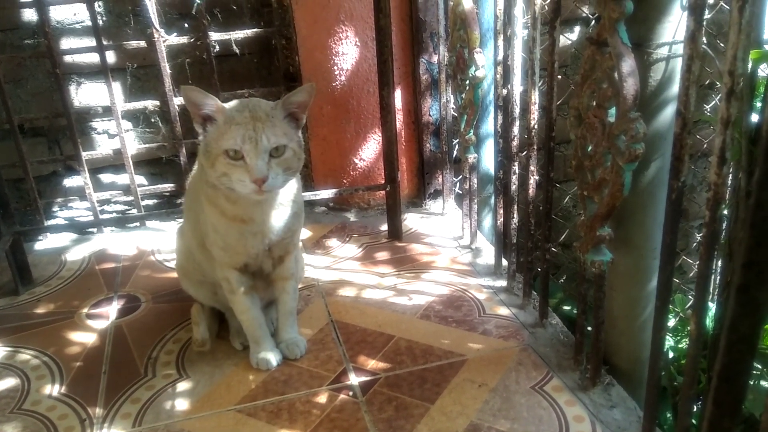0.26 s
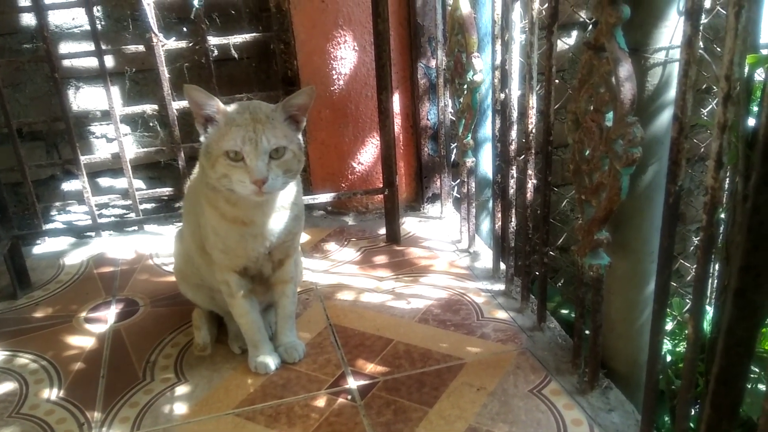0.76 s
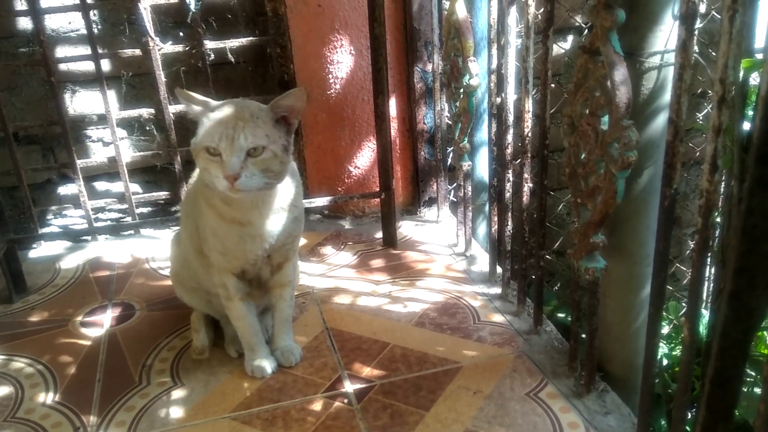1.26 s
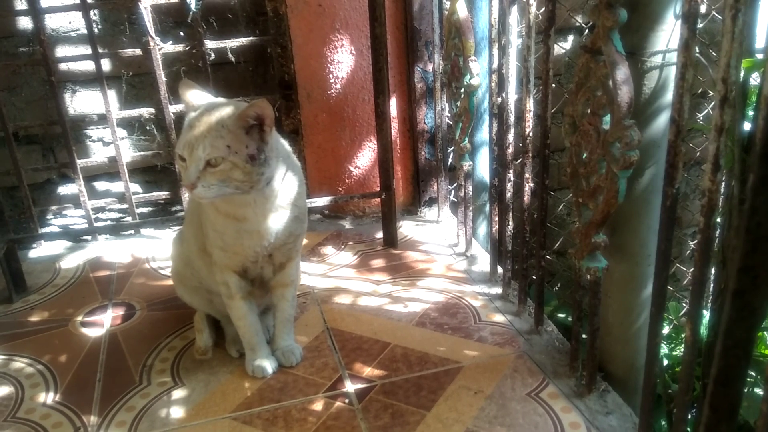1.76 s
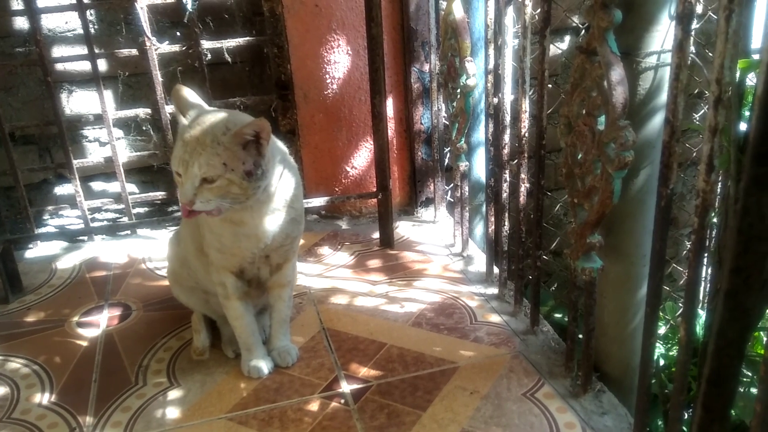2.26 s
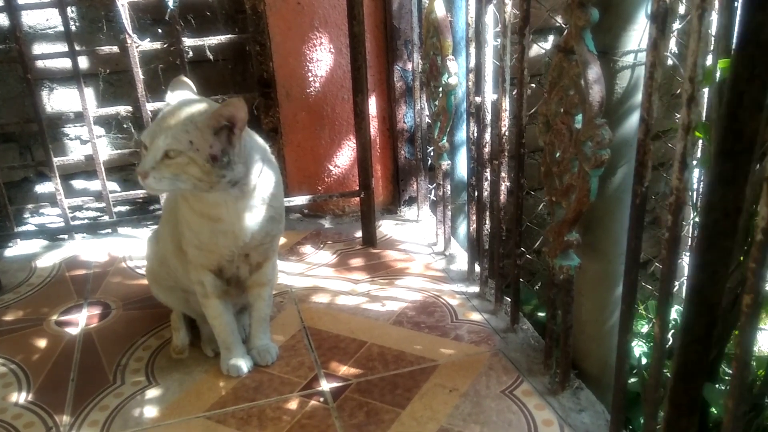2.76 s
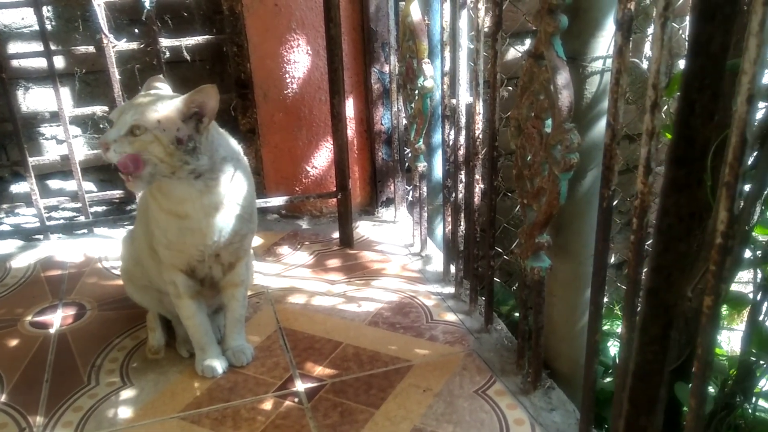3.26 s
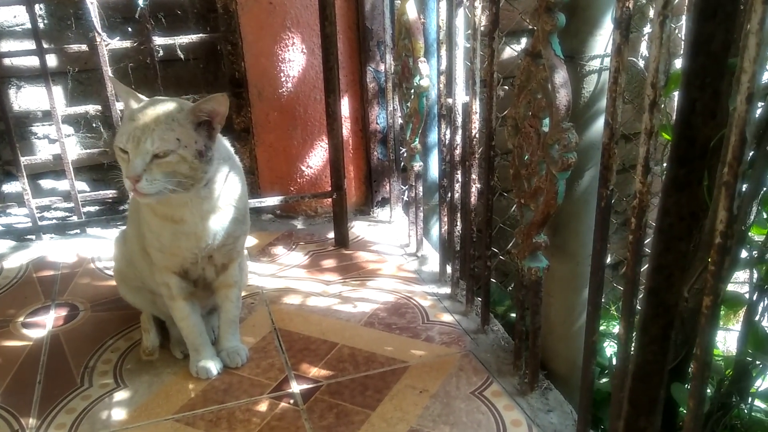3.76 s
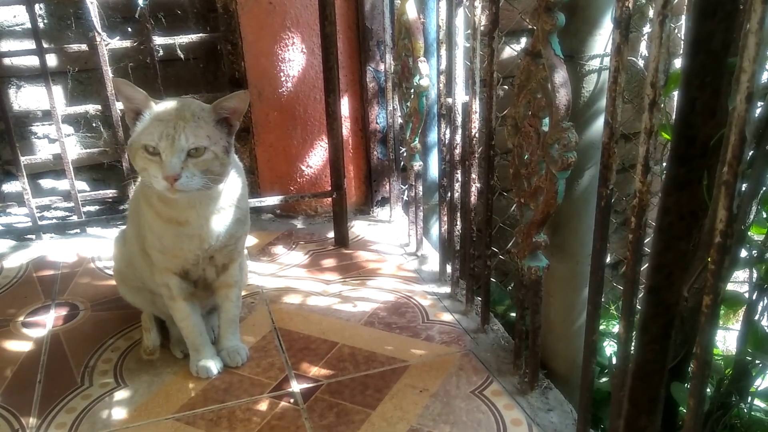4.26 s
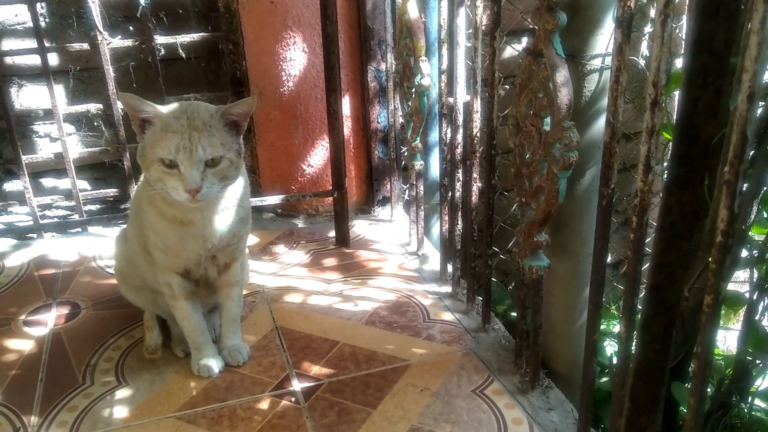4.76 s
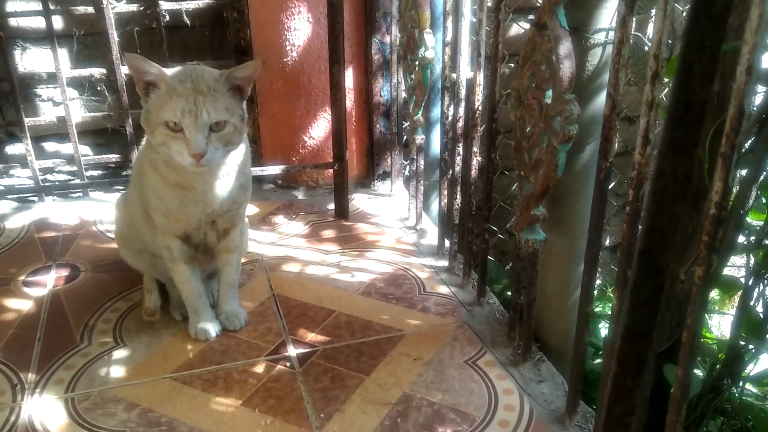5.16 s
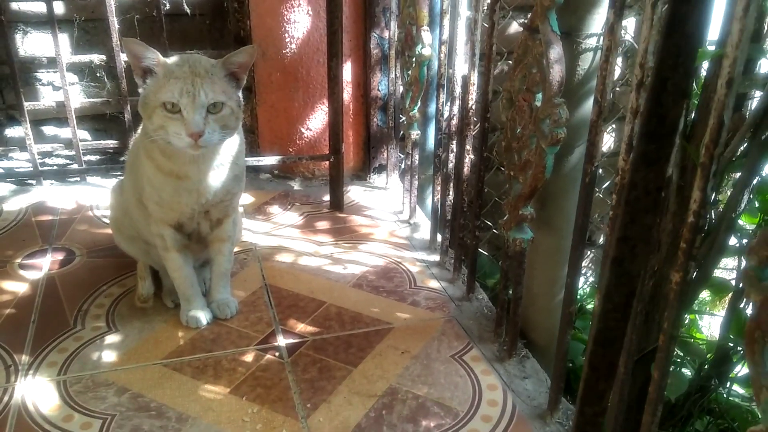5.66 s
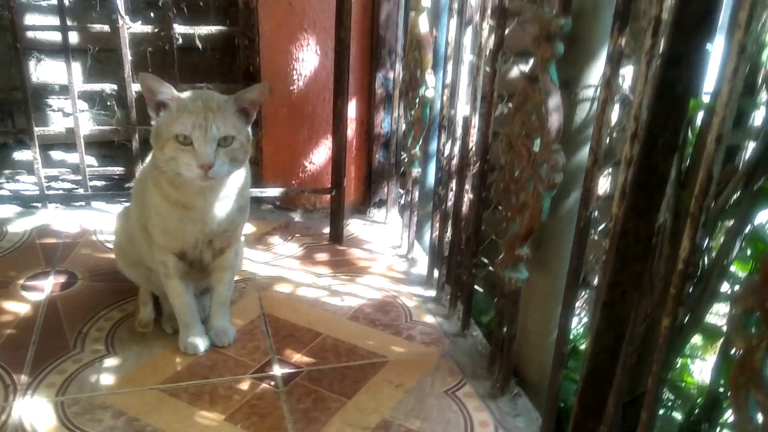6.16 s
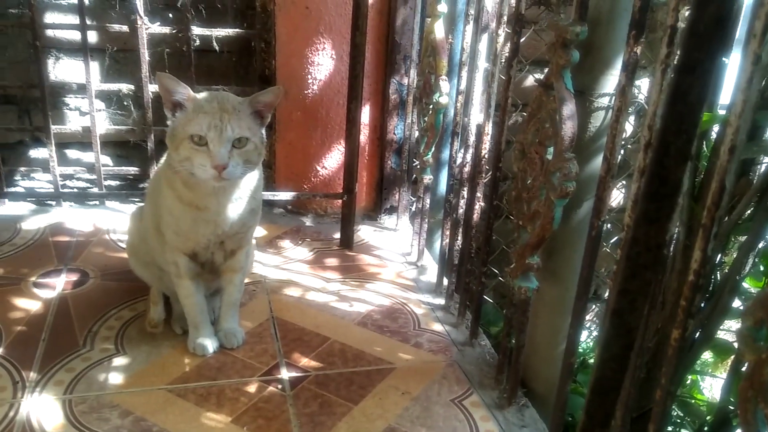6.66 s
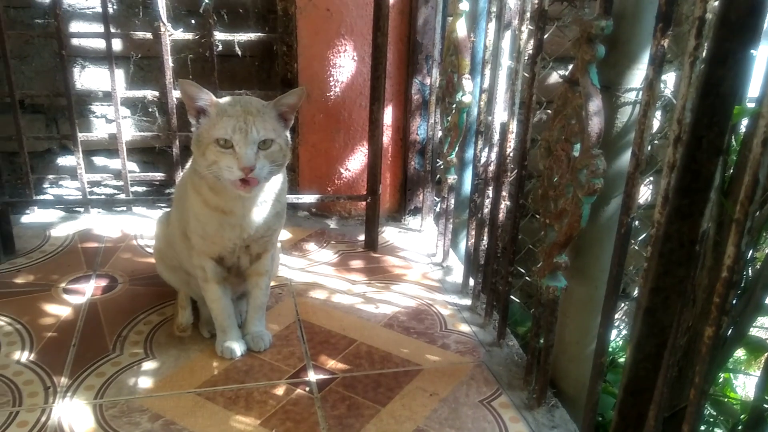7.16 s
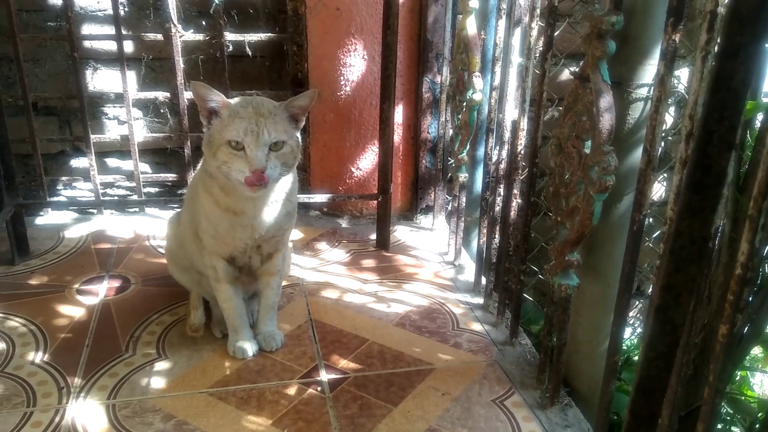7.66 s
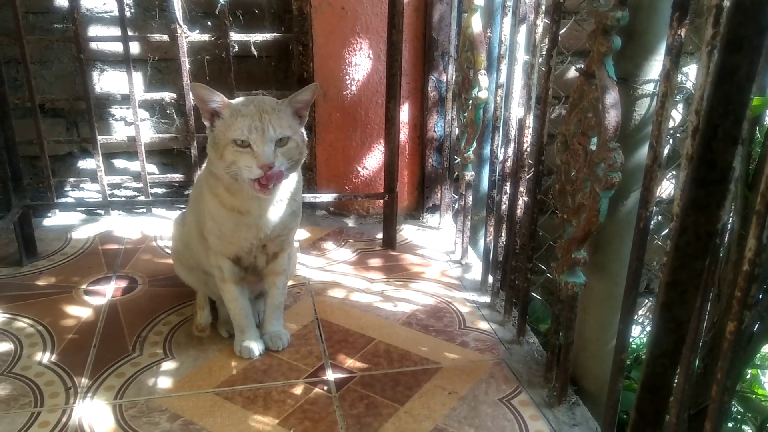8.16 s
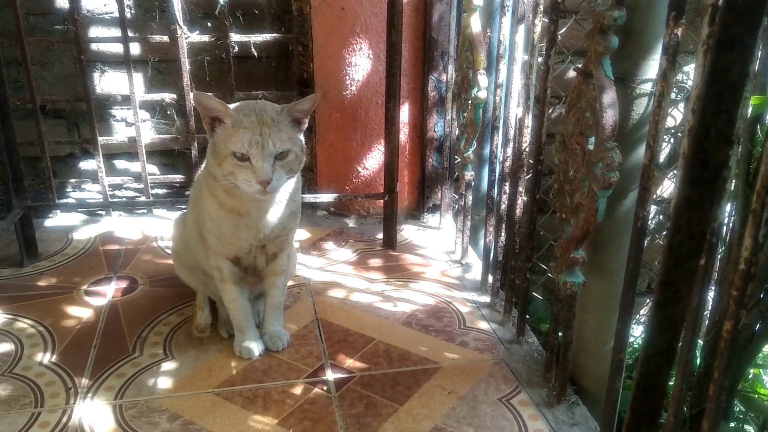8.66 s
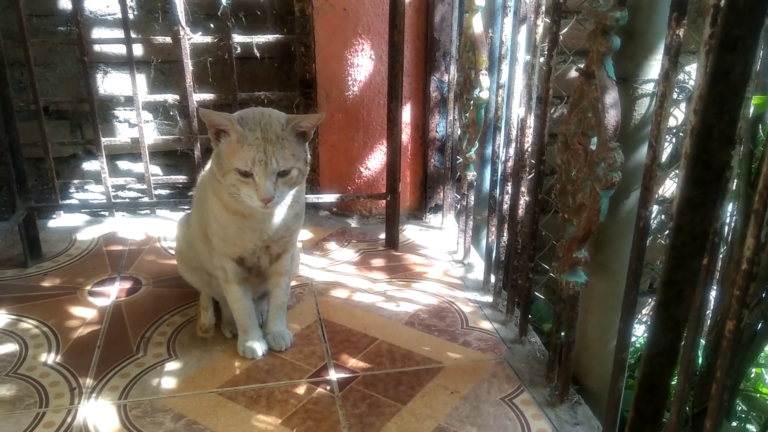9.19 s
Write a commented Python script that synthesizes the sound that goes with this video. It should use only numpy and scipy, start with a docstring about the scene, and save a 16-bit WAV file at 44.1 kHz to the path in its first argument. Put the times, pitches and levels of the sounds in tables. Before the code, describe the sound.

Close stereo pickup of a cat: three nasal, slightly raspy meows, the second strongest, with a scratchy high squeak before the softer third. Thin rising bird chirps dot the background with slight hard-walled reflections. Then a small motorbike approaches beyond the railings, its puttering engine climbing, snapping off throttle as it passes, pulling again and dying into the distance. Noise suppression thins the background between sounds.

```python
"""A cat close by meows three times on a tiled verandah; between the calls come one harsh squeak,
from uneven pulses in a throat resonance, and the rising chirps of a small bird, gliding whistles.
Then a single-cylinder motorbike, firing orders and pulsing noise, pulls away, passes outside and fades.
Each meow is harmonics under a moving mouth resonance with a raspy edge.
Two spaced microphone ports hear it; a noise suppressor lowers the outdoor background when all is quiet."""
import sys
import numpy as np
from scipy import signal
from scipy.fft import rfft, irfft, next_fast_len
from scipy.io import wavfile
from scipy.ndimage import uniform_filter1d

SR = 44100
rng = np.random.default_rng(int(sys.argv[2]) if len(sys.argv) > 2 else 0)


def transcribe(u):
    """Save the signal u as a 16-bit wav file named by the first command-line argument.

    u: samples, shape (n,) or (channels, n), limited to [-1, 1]; the rate is SR.
    q: integer samples, one column per channel.
    """
    v = np.clip(np.atleast_2d(u).T, -1, 1)
    q = np.round(v * 32767).astype(np.int16)
    wavfile.write(sys.argv[1], SR, q)


N = 415863
TIME = np.arange(N) / SR

# outdoor background, spectrum: (frequency [Hz], level [dB])
OUTDOORS = [(25, -20.5), (55, -19.5), (90, 4.5), (140, 5), (400, 3), (1500, -3), (3500, -9.5), (7700, -16),
            (8500, -40), (15000, -33.5)]

# microphone ports, phase by which the left leads: (frequency [Hz], lead [rad])
PORT_PHASE = [(100, .5), (700, .44), (1150, -1.4), (1550, -1.5), (1850, -2.7), (2400, -2), (2900, -1.5),
              (3600, -3)]
# likeness of diffuse sound at the two ports: (frequency [Hz], likeness [0-1])
LIKENESS = [(150, 0.28), (700, 0.99), (1400, 0.38), (2500, .58), (3550, 1), (4200, .07)]
# response of the right port: (frequency [Hz], gain [dB])
RIGHT_PORT = [(100, 1.46), (2800, 0), (4500, 2), (6200, 0.5), (7700, -5.5), (8300, -17.5), (10500, -10.5)]
CUTOFF_HZ = 15650

# bird chirps: (start [s], level [dB])
CHIRPS = [(.115, -51), (.9, -53), (1.86, -49), (2.62, -52), (3.53, -39), (4.045, -70), (4.575, -48),
          (5.68, -60), (6.025, -53), (6.73, -47)]
# a soft rustle as the cat licks its lips and shifts:
# (start [s], attack [s], hold [s], release [s], level [dB])
RUSTLE = (2.32, .15, .02, .25, -57)
# the squeak: (start [s], attack [s], hold [s], release [s], level [dB], sag [dB/s])
SQUEAK = (2.93, .065, .145, .045, -20.3, 28)
# throat during the squeak: (frequency [Hz], gain [dB])
SQUEAK_THROAT = [(150, -66), (330, -37), (410, -25.5), (520, -41.5), (1900, -39.5), (2080, -22),
                 (2250, -28), (2500, -5), (2700, -25), (2950, -9), (3300, 5), (3700, -8), (5300, -27.5),
                 (7100, -20), (8300, -35), (15000, -46)]

# engine speed: (time [s], firing rate [1/s])
ENGINE = [(4.54, 27), (5.1, 27.3), (5.8, 32.3), (6.35, 37), (6.75, 39.3), (6.9, 38.5), (7.0, 35.6),
          (7.38, 28.2), (8.0, 29.3), (8.5, 28.3), (8.9, 23.5)]
# spectrum of the engine and road noise: (frequency [Hz], level [dB])
ROAR_COLOUR = [(60, 17), (130, -4), (240, -1.5), (330, -6), (950, 1), (1350, 4), (2000, -7.5), (3100, -17),
               (3580, -27), (4050, -14), (7600, -17), (8300, -29), (9400, -28.5), (15500, -45)]
# resonance of the silencer: (frequency [Hz], gain [dB])
PIPE = [(70, -21), (115, -6.5), (138, 6), (158, 3.5), (185, -24), (235, -5), (300, -35)]
# the engine's whine, which sinks as the bike goes by: (time [s], frequency [Hz], level [dB])
WHINE = [(5.2, 1280, -66), (6.8, 1540, -41.5), (7.1, 1400, -46), (7.25, 1260, -54), (7.59, 1200, -53),
         (7.65, 1170, -41), (8.7, 1100, -62)]
# the engine's hollow growl, sinking likewise: (time [s], frequency [Hz], level [dB])
GROWL = [(4.7, 800, -70), (6.92, 730, -48), (7.1, 680, -36), (7.19, 620, -50), (7.58, 510, -47),
         (7.635, 450, -38), (7.72, 420, -47), (9.2, 450, -68)]
# what the rider does, in order: pulling hard, top revs, throttle snapping shut with a blare,
# coasting, next gear, easing off far away:
# (start [s], length [s], change of rumble [dB], of clatter [dB], of hiss [dB], of pipe note [dB])
GEAR_CHANGES = [(5.9, .55, 0, .5, 0, 4.5), (6.55, .37, 1.5, 3.5, 2, -2), (6.95, .21, 4, 1.5, 1, 7.5),
                (7.19, .42, -5, -7, -7, -2), (7.62, .48, 2, 1.5, 1.5, -2), (9.0, .6, -1, -3.5, -1, -9)]
THROTTLE_S = .09
# knocks as the bike crosses bumps: (time [s], level [dB], brightness [0-1])
BUMPS = [(6.383, -44, 1), (6.764, -34, .5), (7.618, -32, .4), (7.755, -39, .9)]
# the bike is nearest at PASS_S; the other two set how fast its distance shrinks before and grows after
PASS_S, APPROACH_S, LEAVE_S = 7.2, 1.0, 1.17

# gesture of each meow; the mouth resonance rises as the jaw opens:
# (time [s], pitch [Hz], effort [dB], mouth resonance [Hz], treble [dB])
FIRST_MEOW = [(0.11, 422.0, -86.0, 1054.0, -75.0), (0.195, 465.0, -43.0, 1179.0, -52.0),
              (0.275, 475.0, -34.0, 1316.0, -48.0), (0.315, 500.0, -40.0, 1291.0, -51.0),
              (0.343, 500.0, -30.0, 1348.0, -46.0), (0.376, 515.0, -34.0, 1504.0, -41.0),
              (0.414, 527.0, -29.0, 1460.0, -41.0), (0.436, 524.0, -28.0, 1481.0, -36.0),
              (0.455, 531.0, -29.0, 1491.0, -41.0), (0.476, 524.0, -28.0, 1505.0, -39.0),
              (0.556, 512.0, -33.0, 1526.0, -47.0), (0.673, 509.0, -42.0, 1510.0, -46.0),
              (0.695, 514.0, -54.0, 1452.0, -57.0), (0.761, 508.0, -73.0, 1373.0, -79.0)]
SECOND_MEOW = [(1.458, 513.0, -78.0, 1124.0, -91.0), (1.553, 517.0, -43.0, 1186.0, -51.0),
               (1.612, 533.0, -34.0, 1436.0, -47.0), (1.667, 550.0, -21.0, 1444.0, -52.0),
               (1.7, 576.0, -27.0, 1645.0, -36.0), (1.767, 593.0, -24.0, 1676.0, -38.0),
               (1.85, 600.0, -18.0, 1671.0, -38.0), (2.014, 602.0, -18.0, 1638.0, -40.0),
               (2.1, 615.0, -16.0, 1513.0, -40.0), (2.166, 607.0, -20.0, 1357.0, -41.0),
               (2.249, 576.0, -20.0, 1451.0, -36.0), (2.294, 560.0, -44.0, 1253.0, -67.0),
               (2.36, 561.0, -77.0, 1238.0, -76.0)]
THIRD_MEOW = [(3.351, 529.0, -103.0, 1107.0, -79.0), (3.409, 534.0, -69.0, 1054.0, -76.0),
              (3.538, 529.0, -54.0, 1124.0, -49.0), (3.573, 547.0, -32.0, 1235.0, -56.0),
              (3.641, 530.0, -38.0, 1241.0, -46.0), (3.684, 522.0, -33.0, 1319.0, -43.0),
              (3.798, 526.0, -35.0, 1278.0, -51.0), (3.901, 517.0, -40.0, 1149.0, -57.0),
              (3.937, 506.0, -34.0, 1257.0, -60.0), (3.991, 501.0, -39.0, 1155.0, -66.0),
              (4.025, 495.0, -64.0, 1125.0, -74.0), (4.08, 473.0, -76.0, 1106.0, -76.0)]
# the meows: (gesture, left-right lean of harmonics 2 to 5 [dB], lift of harmonics 4 and 5 [dB],
# left port's fade [s], centre of the nasal trough [Hz], nasal ring [dB], rasp [dB])
MEOWS = [(FIRST_MEOW, (0, -6.5, 3, 6.5), (6, 4), .65, 1964, 10, -7), (SECOND_MEOW, (.4, -5.3, -2.3, 3.8),
         (6, 8), 2.25, 1984, 3, -6), (THIRD_MEOW, (-2.7, -12, -.7, 1.8), (4.2, -1.6), 3.86, 1762, 15, -8)]
# throat of the meows: (frequency [Hz], gain [dB])
THROAT = [(900, -7), (1550, -12), (1820, -9), (2400, 5), (2650, 2), (2740, 19), (2830, -19), (3050, -16)]
MOUTH_DB, MOUTH_HALF_WIDTH_HZ = 29.8, 95
TROUGH_DB, TROUGH_HALF_WIDTH_HZ = 17, 125
# bright edge of the voice, above the fifth harmonic: (frequency [Hz], level [dB])
EDGE = [(3150, -4), (3650, -18), (4200, 1), (4800, 3), (6000, 0), (7200, -2), (7750, 0), (8400, -27),
        (9100, -8), (9800, -11), (10600, -31), (15000, -33)]
# share of the nasal ring that lifts the bright edge: (frequency [Hz], share [0-1])
NASAL = [(3700, 0), (4250, .2), (4720, 1), (5600, .75), (6300, .3), (6800, .1)]
# late in each call a wall reflection briefly cancels it at the left port
NULL_DB, NULL_S = 14, .05


def from_db(db):
    """Decibels to gain."""
    return 10 ** (np.asarray(db) / 20)


def rms_one(x):
    """Scale to unit power."""
    return x / np.sqrt(np.mean(x ** 2) + 1e-20)


def in_time(rows, t=TIME):
    """The columns of a curve table at the times t."""
    s, *columns = np.transpose(rows)
    return [np.interp(t, s, c) for c in columns]


def at_hz(points, hz):
    """Read a spectrum on a log-frequency axis."""
    f, value = np.transpose(points)
    return np.interp(np.log(hz), np.log(f), value)


def span(rows):
    """The samples that a curve table covers."""
    return slice(int(rows[0][0] * SR), int(rows[-1][0] * SR))


def swell(start, attack, hold, release, drop_db):
    """The samples that a short sound covers, and its rounded rise, hold and fall in dB."""
    part = slice(int(start * SR), int((start + attack + hold + release) * SR))
    corners = np.cumsum([0, attack, hold, release])
    away = np.interp(TIME[part] - start, corners, [1, 0, 0, 1])
    return part, -drop_db * away ** 2


def filtered(x, response):
    """Apply a frequency response, given as a function of Hz."""
    n = x.shape[-1]
    size = next_fast_len(n + 2048, True)
    hz = np.maximum(np.arange(size // 2 + 1) * SR / size, 1)
    return irfft(rfft(x, size) * response(hz), size)[..., :n]


def drift(rate, n):
    """Smooth chance of spread 1 that changes about rate times a second, drawn at every 16th sample."""
    coarse = rng.standard_normal(n // 16 + 2)
    slow = filtered(coarse, lambda hz: 1 / (1 + (hz / 16 / rate) ** 4))
    return np.interp(np.arange(n) / 16, np.arange(len(slow)), rms_one(slow))


def diffuse(colour, n=N, low_hz=1, high_hz=SR):
    """Coloured noise from all around, as alike at the two ports as LIKENESS says; rms 1."""
    def port_pair(hz):
        alike = np.clip(at_hz(LIKENESS, hz), 0, .99)
        band = ((1 + (low_hz / hz) ** 8) * (1 + (hz / high_hz) ** 8)) ** -.5
        return np.sqrt([1 + alike, 1 - alike]) * band * from_db(at_hz(colour, hz))
    mid, side = filtered(rng.standard_normal((2, n)), port_pair)
    return rms_one(np.array([mid + side, mid - side]))


def background(sound, open_db=-51, open_at_db=-30, slope=0.63, depth_db=21):
    """The suppressor lets the outdoor rush through as far as the sound is loud."""
    power = uniform_filter1d(np.mean(sound ** 2, axis=0), int(0.018 * SR))
    level = 10 * np.log10(np.maximum(power, 1e-12))
    closing_db = np.clip(slope * (level - open_at_db), -depth_db, 0)
    return from_db(open_db + closing_db) * diffuse(OUTDOORS)


def verandah(x, t60):
    """A thin, dying scatter from tiles, wall and railings."""
    age = TIME[:int(t60 * SR)]
    scatter = diffuse([(100, 5.5), (5000, -1), (12000, -16.5)], len(age))
    tail = scatter * from_db(-60 * age / t60) * (age > .008)
    return signal.fftconvolve(x, tail / np.sqrt(np.sum(tail ** 2) / 2), axes=1)[:, :N]


def walls(x, echo=0.15, count=9):
    """Near walls and the floor return a few fast echoes, which comb the spectrum into fixed streaks."""
    out = x.copy()
    for lag in (rng.uniform(.004, .03, count) * SR).astype(int):
        out[:, lag:] += echo * rng.choice([-1, 1]) * x[:, :-lag]
    return out / np.sqrt(1 + count * echo ** 2)


def bird(buzz_hz=135, buzz=.012, waver=.035, headroom_hz=140, length=.135, first_hz=4400, last_hz=5350):
    """Whistles glide up, rough then purer, and reach the two ports by different paths."""
    out = np.zeros((2, N))
    for start, db in CHIRPS:
        at, n = int(start * SR), int(length * SR)
        progress = np.linspace(0, 1, n)
        rise = np.sin(np.pi / 2 * np.clip((progress - .12) / .5, 0, 1)) ** 2
        glide = first_hz + (last_hz - first_hz) * rise
        rough = np.linspace(2, .3, n)
        trill = np.sin(2 * np.pi * np.cumsum(buzz_hz * (1 + drift(20, n) / 10)) / SR)
        envelope = from_db(db) * np.sin(np.pi * progress ** 1.15) ** 2 * (1 + 0.25 * trill)
        for port in out:
            pitch = glide * (1 + rough * (buzz * trill + waver * drift(500, n)))
            pitch = np.minimum(pitch, glide.max() + headroom_hz)
            port[at:at + n] += envelope * np.sqrt(2) * np.sin(2 * np.pi * np.cumsum(pitch) / SR)
    return out


def rustle():
    """A soft swell of noise from fur and lips."""
    *timing, level_db = RUSTLE
    part, shape_db = swell(*timing, drop_db=36)
    out = np.zeros((2, N))
    noise = diffuse(OUTDOORS, len(shape_db), low_hz=434, high_hz=5500)
    out[:, part] = from_db(level_db + shape_db) * noise
    return out


def squeak(pitch_hz=410, jitter=.06, air_db=-2, flutter_db=1.0):
    """Very uneven pulses and pulsing air drive a narrow high throat resonance."""
    *timing, level_db, sag = SQUEAK
    part, shape_db = swell(*timing, drop_db=52)
    n = len(shape_db)
    since_attack = np.maximum(np.arange(n) / SR - timing[1], 0)
    level = level_db + shape_db - sag * since_attack
    cycles = np.cumsum(pitch_hz * (1 + jitter * drift(250, n))) / SR
    pulses = np.diff(np.floor(cycles), prepend=0)  # one click a cycle
    voiced = rms_one(filtered(pulses, lambda hz: from_db(at_hz(SQUEAK_THROAT, hz))))
    air = diffuse(SQUEAK_THROAT, n) * (1 + 0.29 * np.cos(2 * np.pi * cycles))
    out = np.zeros((2, N))
    out[:, part] = from_db(level + flutter_db * drift(130, n)) * rms_one(voiced + from_db(air_db) * air)
    return out


def passing(nearest_db, falloff_db):
    """Level of a part of the bike in dB: it drops by falloff_db for a tenfold distance."""
    pace_s = np.where(TIME < PASS_S, APPROACH_S, LEAVE_S)
    distance = np.hypot(1, (TIME - PASS_S) / pace_s)  # 1 at the nearest point
    return nearest_db - falloff_db * np.log10(distance)


def throttle():
    """What the gear changes add to rumble, clatter, hiss and pipe note, in dB."""
    total = 0
    for start, length, *change_db in GEAR_CHANGES:
        to_edge = np.minimum(TIME - start, start + length - TIME)
        total = total + np.outer(change_db, np.clip(to_edge / THROTTLE_S + .5, 0, 1))
    return total


def exhaust(phase, firing, throttle_db, fade_db=3.0, wander=0.3, turn_s=6.82, waver_db=2.2,
            behind_tilt_db=8.0):
    """Orders of the firing rate slide through the silencer's resonance, fading unevenly among houses."""
    # as the bike draws level, the open pipe turns to the verandah and its low orders take over
    behind = np.clip((TIME - turn_s) / 0.15, 0, 1)
    orders = range(3, 10)
    gains = []
    for k in orders:
        tilt_db = behind_tilt_db * behind * min(k, 5)
        gains.append(from_db(at_hz(PIPE, k * firing) - tilt_db + fade_db * drift(6.05, N)))
    gains = np.array(gains)
    gains /= np.sqrt(np.sum(gains ** 2, axis=0))
    pipe = sum(gain * np.sin(k * phase + wander * drift(12, N)) for k, gain in zip(orders, gains))
    pipe_level_db = passing(nearest_db=-43, falloff_db=44) + throttle_db
    note = from_db(pipe_level_db + waver_db * drift(5, N)) * pipe
    # the deep boom at twice the firing rate radiates only at high revs
    radiated_db = at_hz([(57, -36), (69, -20), (77, 0)], 2 * firing)
    boom = from_db(passing(nearest_db=-48, falloff_db=40) + radiated_db) * np.sin(2 * phase)
    return np.sqrt(2) * (note + boom)


def resonance(curve, half_width_hz, apart):
    """Engine noise rings in one narrow, moving resonance; apart is how much the two ports differ."""
    hz, db = in_time(curve)
    carrier = np.exp(2j * np.pi * np.cumsum(hz) / SR)
    mid, side = [np.real(carrier * (drift(half_width_hz, N) + 1j * drift(half_width_hz, N)))
                 for _ in range(2)]
    return from_db(db) * rms_one(mid + apart * side * [[1], [-1]])


def motorbike(throb=0.12, flicker_db=1.55):
    """Firing drives exhaust orders and puffs in the noise; treble fades fastest with distance."""
    firing, = in_time(ENGINE)
    phase = 2 * np.pi * np.cumsum(firing * (1 + .008 * drift(8, N))) / SR
    *roar_db, pipe_db = throttle()
    rumble_db, clatter_db, hiss_db = [db + flicker_db * drift(32, N) for db in roar_db]
    rumble = diffuse(ROAR_COLOUR, low_hz=166, high_hz=740)
    roar = from_db(passing(nearest_db=-39.5, falloff_db=64) + rumble_db) * rumble
    clatter = diffuse(ROAR_COLOUR, low_hz=780, high_hz=2300)
    roar += from_db(passing(nearest_db=-39, falloff_db=66) + clatter_db) * clatter
    # the engine's clatter carries forwards, so it is heard from afar on the approach
    ahead = np.clip(PASS_S - TIME, 0, 1)
    forward = diffuse(ROAR_COLOUR, low_hz=800, high_hz=890)
    roar += ahead * from_db(passing(nearest_db=-53, falloff_db=32)) * forward
    rings = resonance(WHINE, half_width_hz=150, apart=.5) + resonance(GROWL, half_width_hz=110, apart=.2)
    hiss = from_db(passing(nearest_db=-37.5, falloff_db=84) + hiss_db) * diffuse(ROAR_COLOUR, low_hz=2000)
    puffs = 1 + throb * np.cos(phase)
    running = np.clip((TIME - ENGINE[0][0]) / 0.16, 0, 1)
    return running * (exhaust(phase, firing, pipe_db) + walls(puffs * roar + hiss) + puffs * rings)


def bumps(t60=0.42, rise_s=0.002):
    """Loose parts of the bike rattle briefly after each jolt: decaying noise, dull to bright."""
    dull = diffuse(ROAR_COLOUR, low_hz=201, high_hz=2050)
    bright = diffuse(ROAR_COLOUR, low_hz=3300)
    out = np.zeros((2, N))
    for s, db, brightness in BUMPS:
        part = slice(int(s * SR), int((s + t60) * SR))
        age = TIME[part] - TIME[part][0]
        envelope = from_db(db - 60 * age / t60) * (1 - np.exp(-age / rise_s))
        out[:, part] += envelope * ((1 - brightness) * dull[:, part] + brightness * bright[:, part])
    return out


def tract(hz, mouth_hz, trough_hz):
    """Gain in dB of the throat, the mouth resonance and the trough that the nose cuts."""
    mouth = MOUTH_DB / (1 + ((hz - mouth_hz) / MOUTH_HALF_WIDTH_HZ) ** 2)
    trough = TROUGH_DB / (1 + np.abs((hz - trough_hz) / TROUGH_HALF_WIDTH_HZ) ** 10)
    return at_hz(THROAT, hz) + mouth - trough


def edge(pitch, phase, nasal_db, rasp_db, flicker=.5, halfway_db=-12):
    """Upper harmonics, weaker lines between and pulsing rasp ring in the nose, mixed per port; rms 1."""
    n = len(pitch)
    colour = [(hz, at_hz(EDGE, hz) + nasal_db * at_hz(NASAL, hz)) for hz in np.geomspace(3000, 15000, 100)]
    upper = np.zeros((2, n))
    for k in range(6, 22):
        for port in upper:
            gain = from_db(at_hz(colour, k * pitch)) * (1 + flicker * drift(22, n))
            port += gain * np.sin(k * phase + 0.8 * drift(9.2, n) + .2 * drift(150, n))
        between = from_db(at_hz(colour, (k + .5) * pitch) + halfway_db) * drift(60, n)
        upper += between * np.sin((k + .5) * phase)
    rasp = diffuse(colour, n, low_hz=3400) * (1 + .7 * np.cos(phase))
    return rms_one(rms_one(upper) + from_db(rasp_db) * rasp)


def meow(gesture, leans_db, lifts_db, fade_s, trough_hz, nasal_db, rasp_db, jitter=0.003,
         shimmer_db=.9, sway_db=1.8, fundamental_db=-33, flutter_db=1.8):
    """Clean harmonics pass the moving mouth resonance under a raspy edge; the upper ones flutter."""
    t = TIME[span(gesture)]
    n = len(t)
    pitch, effort_db, mouth_hz, treble_db = in_time(gesture, t)
    left_fade = from_db(-NULL_DB * np.exp(-((t - fade_s) / NULL_S) ** 2))
    phase = 2 * np.pi * np.cumsum(pitch * (1 + jitter * drift(130, n))) / SR
    voice, strong = np.zeros((2, n)), []
    # effort drives harmonics 2 and 3, treble drives 4 and 5
    drives_db = [effort_db] * 2 + [treble_db + db + flutter_db * drift(36, n) for db in lifts_db]
    for k, (lean_db, drive_db) in enumerate(zip(leans_db, drives_db), start=2):
        gain_db = drive_db + tract(k * pitch, mouth_hz, trough_hz)
        strong.append(from_db(gain_db + shimmer_db * drift(27, n)))
        # gliding through the wall reflections, each harmonic sways between the ports
        ratio = from_db(lean_db + sway_db * drift(7, n))
        ports = np.array([left_fade * ratio ** .5, ratio ** -.5])
        voice += strong[-1] * ports * np.sin(k * phase + 0.22 * drift(3.4, n) * [[1], [-1]])
    voice += from_db(fundamental_db) * strong[0] * np.sin(phase)
    bright = from_db(treble_db) * edge(pitch, phase, nasal_db, rasp_db)
    out = np.zeros((2, N))
    out[:, span(gesture)] = (np.sqrt(2) * voice + bright) * signal.windows.tukey(n, .06)
    return out


def scene():
    """The cat close by, the bird and the road beyond the railings."""
    cat = sum(meow(*row) for row in MEOWS)
    harsh, chirps = walls(squeak(), echo=0.16), bird()
    wet = verandah(from_db(-37) * cat, t60=0.33)
    wet += verandah(from_db(-18) * harsh + from_db(-12.5) * chirps, t60=0.32)
    sound = cat + harsh + chirps + wet + rustle() + motorbike() + bumps()
    return sound + background(sound)


def record(dry):
    """The left port is shifted in phase, the right port is dull in the treble, and the top is cut."""
    def ports(hz):
        return np.array([np.exp(1j * at_hz(PORT_PHASE, hz)), from_db(at_hz(RIGHT_PORT, hz))])
    heard = filtered(dry, ports)
    return signal.sosfilt(signal.ellip(10, .2, 80, CUTOFF_HZ, fs=SR, output="sos"), heard)


dry = scene()
out = record(dry)
transcribe(out)
```